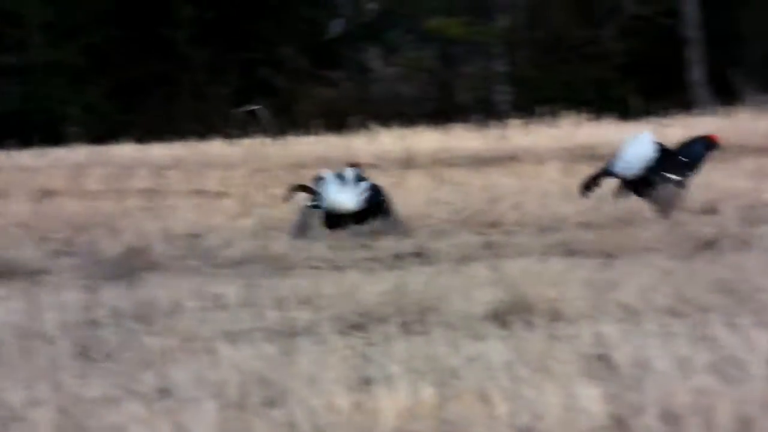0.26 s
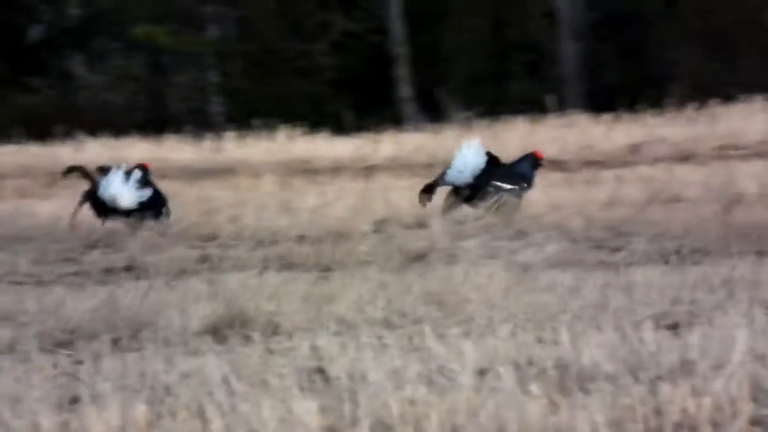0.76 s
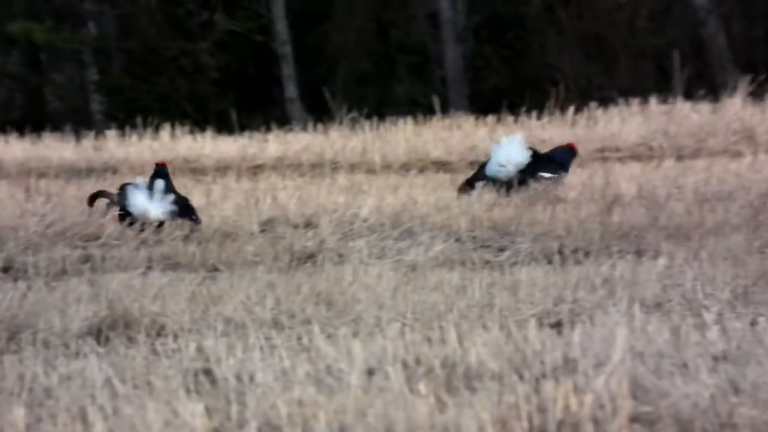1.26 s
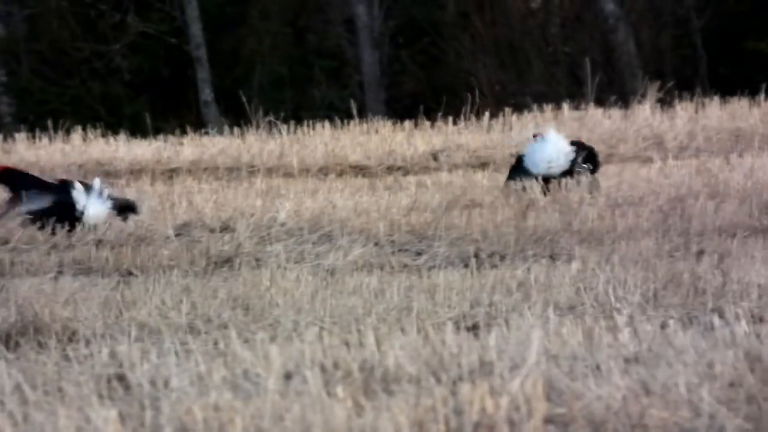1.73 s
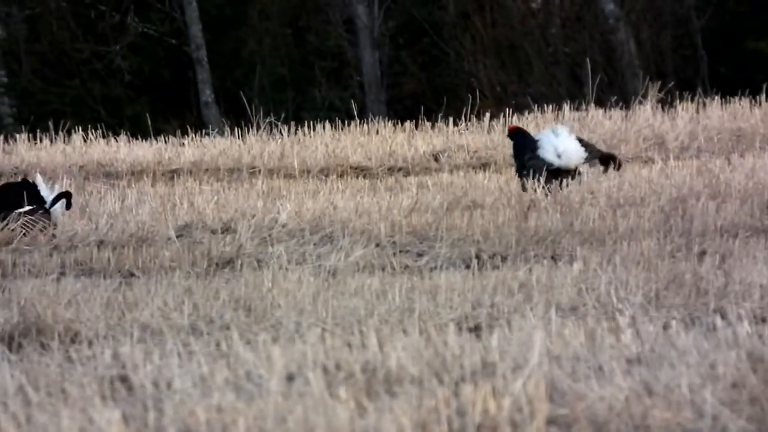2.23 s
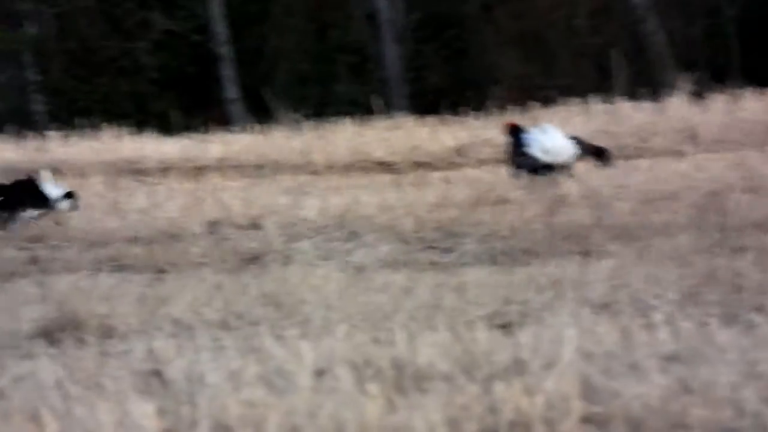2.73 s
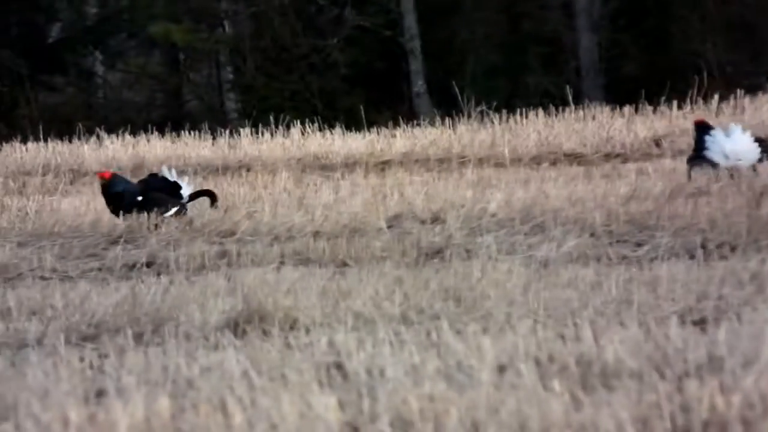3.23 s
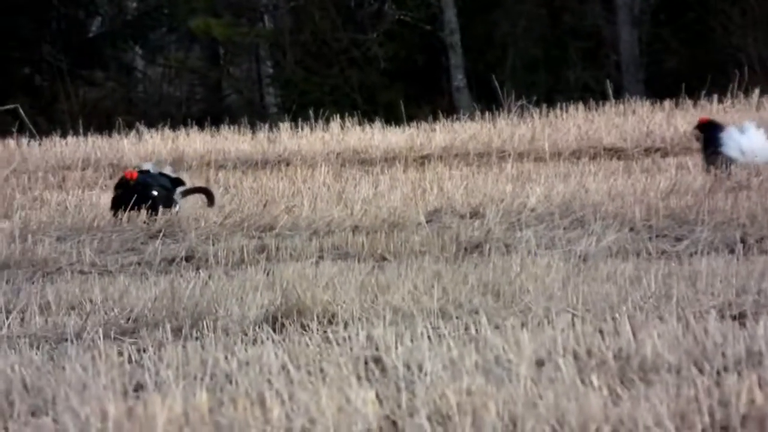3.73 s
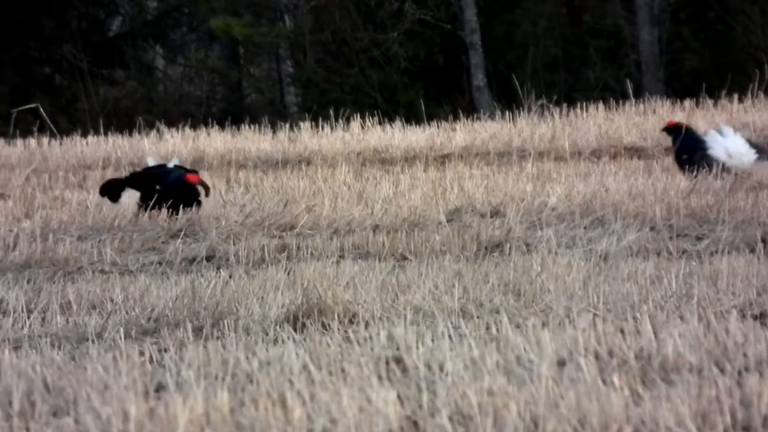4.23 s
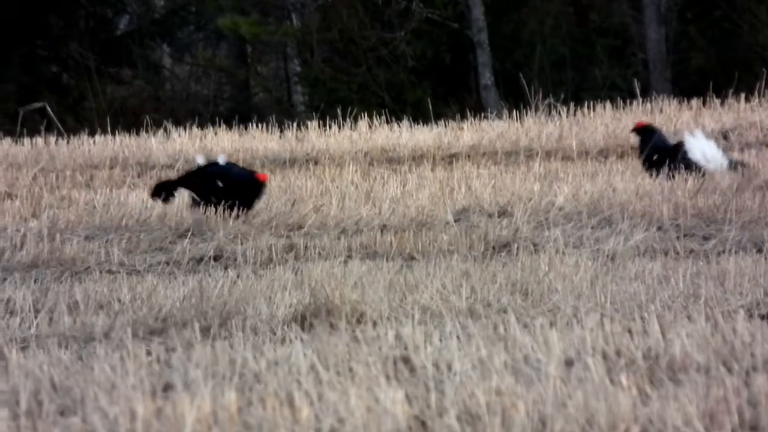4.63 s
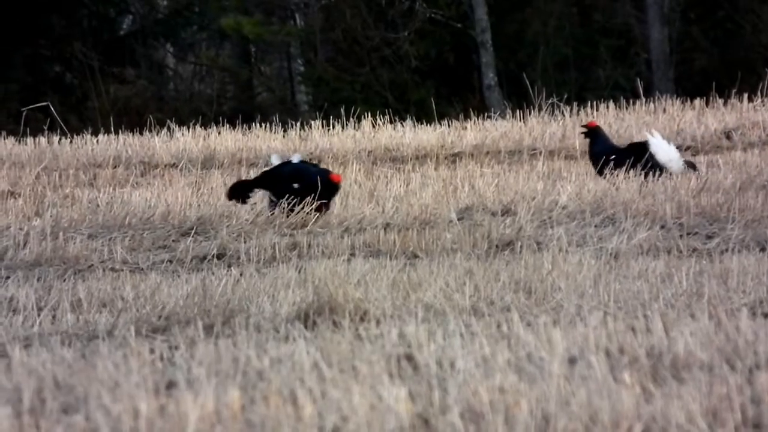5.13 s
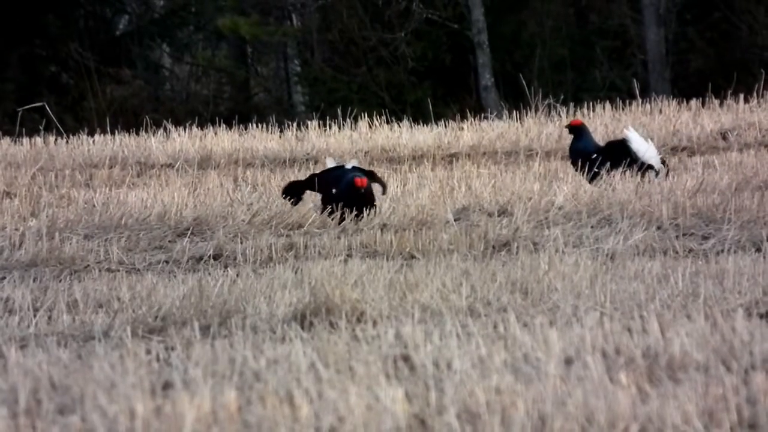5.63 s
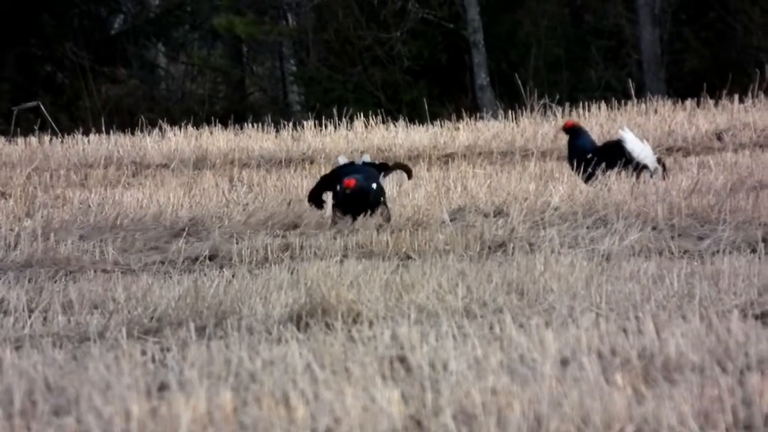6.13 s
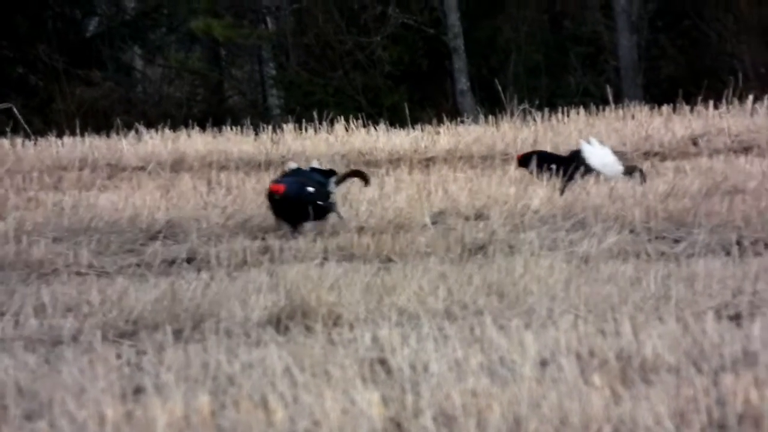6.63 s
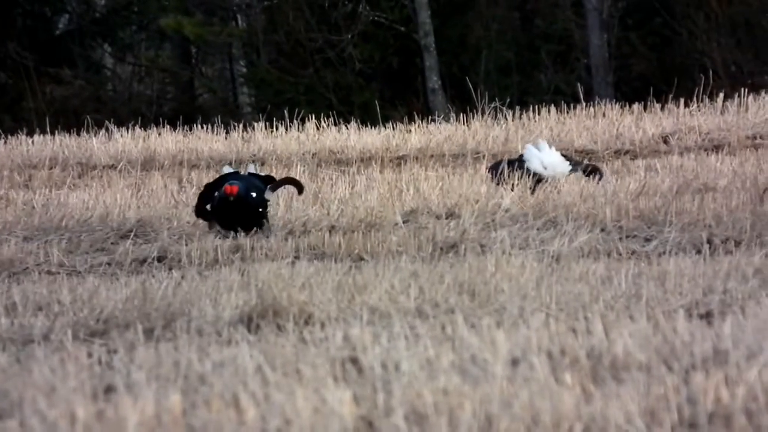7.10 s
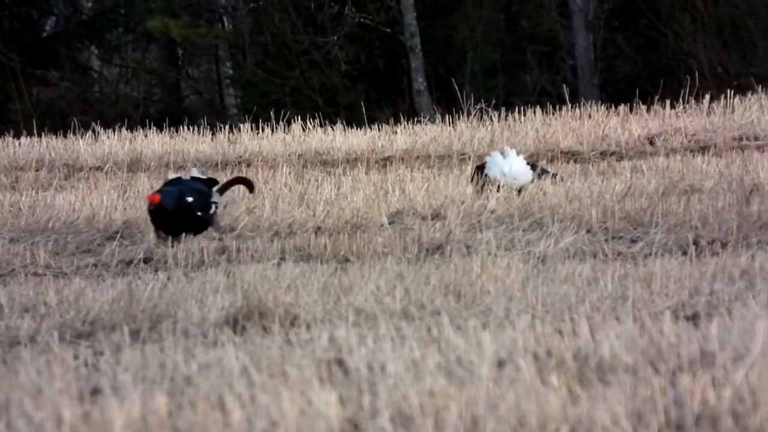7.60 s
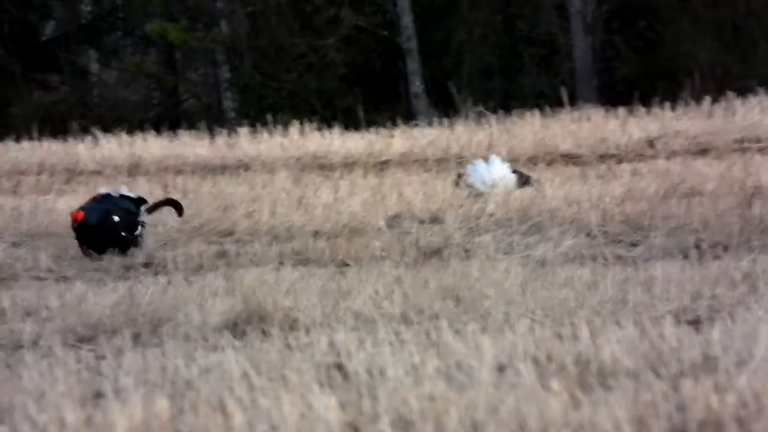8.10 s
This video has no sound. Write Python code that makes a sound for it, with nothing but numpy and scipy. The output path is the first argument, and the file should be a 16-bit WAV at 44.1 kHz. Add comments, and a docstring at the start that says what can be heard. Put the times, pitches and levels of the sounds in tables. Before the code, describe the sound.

Black grouse cocks on a stubble field keep up a continuous low bubbling of short, round, falling coos, several birds overlapping out of step. Far crows caw hoarsely throughout, a small bird pipes thinly early on, and later there is one clear hoot and a faint twitter. Sharp clicks, brief early scuffs, faint ticking, buzz and tiny high pips come from the camera and handling beside the microphone, over soft steady hiss.

```python
"""Black grouse cocks display on a stubble field at the edge of a wood.
Four near cocks repeat one strophe of short, pure, mostly falling coos, out of step, over the bubbling lek.
Far off, crows caw with rough harmonics, one clear hoot sounds, and small birds pipe and twitter.
At the microphone, shaped noise makes clicks, brief scuffs and steady hiss.
The camera beside it ticks and buzzes in narrow noise bands and whines in short pips of one high tone."""
import sys
import numpy as np
from scipy import signal
from scipy.io import wavfile

SR = 44100
rng = np.random.default_rng(int(sys.argv[2]) if len(sys.argv) > 2 else 0)


def output_pcm(signal):
    """Save a mono or channel-first signal as 16-bit PCM at the path in sys.argv[1].

    Samples are clipped to [-1, 1] before scaling.
    """
    pcm = np.clip(np.atleast_2d(signal).T, -1, 1) * 32767
    wavfile.write(sys.argv[1], SR, np.round(pcm).astype(np.int16))


N = 368676
TIME = np.arange(N) / SR   # [s]


def from_db(db):
    """Turn decibels into an amplitude gain."""
    return 10 ** (np.asarray(db) / 20)


def rms_one(x):
    """Scale a sound to unit power."""
    return x / np.sqrt(np.mean(x ** 2) + 1e-20)


def in_time(rows):
    """Read a (time, value) curve at every sample."""
    return np.interp(TIME, *np.transpose(rows))


def at_hz(points, hz):
    """Read a (frequency, value) curve on a log-frequency axis."""
    curve_hz, values = np.array(points).T
    return np.interp(np.log(hz), np.log(curve_hz), values)


def pan(lean_db):
    """Left and right gains that differ by lean_db; positive leans left."""
    return from_db(np.array([[.5], [-.5]]) * lean_db)


def band(x, low_hz, high_hz, order=2):
    """Butterworth band-pass."""
    sections = signal.butter(order, [low_hz, high_hz], "band", fs=SR, output="sos")
    return signal.sosfilt(sections, x + 1e-18)


def drift(rate):
    """Random wander of spread about 1, drawn as straight lines between 'rate' knots a second."""
    knots = rng.standard_normal(N // 40)
    return np.interp(TIME * rate, np.arange(len(knots)), knots)


def add(out, s, sound):
    """Mix a sound in from time s, trimmed to the scene."""
    at = round(s * SR) + np.arange(len(sound))
    inside = (at >= 0) & (at < N)
    out[at[inside]] += sound[inside]


# likeness of the two sides: (frequency [Hz], left-right correlation)
SIDE_CORRELATION = [(30, 0.16), (150, 0.048), (400, 0.64), (1000, .05), (3000, -0.013), (10000, -0.19)]
# balance of the two sides: (frequency [Hz], left minus right [dB])
SIDE_BALANCE = [(100, -1.5), (1000, -0.5), (2500, 0.5), (5000, 1.5), (10000, 0.5)]


def noise(spectrum):
    """Stereo noise of unit power, in third-octave bands that follow a spectrum."""
    out, edges = 0, np.geomspace(22, 14000, 29)
    white = rng.standard_normal((2, 2, N))
    for k, (low, high) in enumerate(zip(edges, edges[1:])):
        mid, side = band(white[k % 2], low, high, order=3)
        hz = np.sqrt(low * high)
        alike = np.clip(at_hz(SIDE_CORRELATION, hz), -1, 1)
        pair = np.sqrt(1 + alike) * mid + np.sqrt(1 - alike) * side * [[1], [-1]]
        out = out + from_db(at_hz(spectrum, hz)) * pan(at_hz(SIDE_BALANCE, hz)) * pair
    return rms_one(out)


def wood(x, t60, count=160):
    """Many faint echoes from the trunks, different for each ear, falling 60 dB in t60 seconds."""
    out = np.zeros((2, N))
    for ear in out:
        share, size = rng.random(count), rng.standard_normal(count)
        size = size * from_db(-40 * share)
        delays = (share * t60 * 2 / 3 * SR).astype(int)   # the first 40 dB of the decay
        for delay, gain in zip(delays, size / np.linalg.norm(size)):
            ear[delay:] += gain * x[:N - delay]
    return out


def gesture(length, hz, fall_hz, arch_hz):
    """Swell and phase of one note whose pitch arches and falls."""
    u = np.linspace(-1, 1, max(int(length * SR), 2))   # start to end of the note
    swell = np.abs(np.cos(np.pi * u / 2)) ** 1.5
    pitch = hz - fall_hz * u - arch_hz * u * u
    return swell, 2 * np.pi * (np.cumsum(pitch) / SR + rng.random())


def notes(rows):
    """Pure notes: a single gliding fundamental each, with no overtones."""
    out = np.zeros(N)
    for s, length, hz, fall_hz, arch_hz, level_db in rows:
        swell, phase = gesture(length, hz, fall_hz, arch_hz)
        add(out, s - length / 2, from_db(level_db) * swell * np.sin(phase))
    return out


# one strophe, shared by all near cocks; it climbs to a high flick and a long arch, then tumbles down:
# (middle from the flick [s], length [s], pitch [Hz], fall per half note [Hz], arch [Hz],
#  relative peak [dB])
STROPHE_NOTES = [(-1.177, 0.073, 491.0, 126.0, 0.0, -24.1), (-0.816, 0.093, 515.0, 85.0, 67.0, -23.5),
                 (-0.717, 0.037, 531.0, 124.0, 31.0, -20.8), (-0.586, 0.108, 488.0, 124.0, 22.0, -25.2),
                 (-0.495, 0.048, 459.0, 71.0, 2.0, -23.5), (-0.427, 0.091, 490.0, 108.0, 58.0, -24.3),
                 (-0.295, 0.082, 455.0, 61.0, 5.0, -25.5), (-0.144, 0.095, 523.0, 5.0, 184.0, -20.6),
                 (-0.069, 0.042, 491.0, 107.0, 0.0, -23.8), (0.0, 0.029, 575.0, 78.0, 33.0, -16.1),
                 (0.094, 0.084, 587.0, 49.0, 200.0, -18.3), (0.166, 0.089, 528.0, -53.0, 200.0, -26.8),
                 (0.257, 0.054, 496.0, 102.0, 67.0, -20.4), (0.373, 0.059, 491.0, 90.0, 95.0, -30.9),
                 (0.455, 0.032, 533.0, 150.0, 91.0, -24.5), (0.665, 0.034, 439.0, 77.0, 0.0, -25.6),
                 (0.81, 0.046, 444.0, 23.0, 95.0, -23.7), (0.888, 0.044, 433.0, 43.0, 58.0, -25.3),
                 (1.026, 0.051, 465.0, 108.0, 0.0, -22.2), (1.104, 0.07, 452.0, 53.0, 82.0, -25.4),
                 (1.252, 0.091, 463.0, 112.0, 0.0, -25.2), (1.331, 0.032, 476.0, 100.0, 63.0, -22.3)]
# four near cocks, bird by bird, each repeating the strophe about every 3 s:
# (flick [s], relative level [dB], pitch shift [Hz], lead-in stretch [ratio], ending stretch [ratio])
STROPHE_BOUTS = [(0.468, 0.9, 3.0, 1.011, 1.004), (3.227, 1.1, 1.0, 1.004, 1.002),
                 (5.965, 0.8, 8.0, 1.001, 1.001), (8.757, 1.8, 4.0, 1.01, 0.999),
                 (1.902, 0.9, -5.0, 1.001, 0.995), (4.706, -0.0, -2.0, 0.987, 1.004),
                 (7.525, -0.9, -1.0, 0.993, 1.059), (0.894, 0.4, 0.0, 0.994, 1.036),
                 (4.056, -0.8, -1.0, 1.022, 0.999), (7.083, 0.8, 0.0, 0.995, 1.008),
                 (0.682, -9.0, -31.0, 0.991, 0.996), (3.465, -0.7, 8.0, 1.012, 1.004),
                 (6.232, 1.3, 5.0, 1.024, 0.998)]


def near_cocks():
    """Each bout is the same strophe at its own pitch, pace and strength; the throat passes pure tones."""
    rows = []
    for flick_s, bout_db, shift_hz, lead_in, ending in STROPHE_BOUTS:
        for s, length, hz, fall_hz, arch_hz, level_db in STROPHE_NOTES:
            middle_s = flick_s + s * (lead_in if s < 0 else ending)
            rows.append((middle_s, length, hz + shift_hz, fall_hz, arch_hz, level_db + bout_db))
    return notes(rows)


def far_cock(pitch_hz, spread_hz, fall_hz, arch_hz, length, step, count=150):
    """One bird farther out bubbling on and on, each coo a little different in time, pitch and level."""
    chance = rng.standard_normal((count, 6)).T
    times = (np.arange(count) - rng.random() + .2 * chance[0]) * step
    lengths = length * from_db(1.5 * chance[1])
    pitches = pitch_hz + spread_hz * np.tanh(chance[2])
    falls = fall_hz * (1 + .5 * chance[3])
    arches = arch_hz * (1 + .5 * chance[4])
    return rms_one(notes(zip(times, lengths, pitches, falls, arches, 1.9 * chance[5])))


# swell of the rest of the lek: (time [s], relative level [dB])
CHORUS_LEVEL = [(0, -26.6), (.22, -35), (.3, -26), (.85, -31), (1.01, -25), (1.23, -33), (2.02, -25.8),
                (2.42, -34), (2.6, -28), (3.65, -26), (3.8, -33), (4.22, -25.2), (4.4, -33), (4.75, -27),
                (5.28, -33), (5.39, -25), (6.8, -29), (8.36, -26.5)]


def chorus():
    """Two higher and two lower voices; the throat sac radiates only near its resonance."""
    high = sum(far_cock(pitch_hz=525, spread_hz=45, fall_hz=58, arch_hz=38, length=.06, step=.085)
               for _ in range(2))
    low = sum(far_cock(pitch_hz=448, spread_hz=34, fall_hz=44, arch_hz=28, length=.062, step=.078)
              for _ in range(2))
    voices = rms_one(band(low + from_db(-1) * high, 330, 635, order=4))
    return from_db(in_time(CHORUS_LEVEL) - 7.5) * voices


# stronger moments of the lek: single coos, and brief swells where overlapping coos beat together:
# (middle [s], length [s], pitch [Hz], fall per half note [Hz], relative peak [dB])
STRONG_MOMENTS = [(0.029, 0.022, 498.0, -40.0, -15.0), (0.286, 0.084, 482.0, 65.0, -24.0),
                  (0.33, 0.04, 495.0, 71.0, -19.0), (0.37, 0.023, 506.0, -14.0, -18.0),
                  (0.448, 0.029, 467.0, -35.0, -21.3), (0.571, 0.029, 434.0, 27.0, -23.3),
                  (0.655, 0.048, 467.0, 28.0, -20.4), (0.792, 0.023, 498.0, -40.0, -18.7),
                  (1.026, 0.083, 524.0, -28.0, -20.3), (1.208, 0.046, 421.0, 34.0, -30.3),
                  (1.449, 0.09, 426.0, -20.0, -27.5), (1.512, 0.05, 543.0, 1.0, -30.2),
                  (1.657, 0.06, 447.0, 64.0, -23.7), (1.71, 0.027, 478.0, -18.0, -19.6),
                  (1.859, 0.042, 433.0, 33.0, -27.1), (1.882, 0.073, 468.0, 116.0, -20.2),
                  (1.962, 0.095, 505.0, 108.0, -22.4), (2.049, 0.11, 481.0, 73.0, -21.2),
                  (2.113, 0.082, 488.0, 137.0, -21.3), (2.202, 0.059, 488.0, 75.0, -17.7),
                  (2.328, 0.042, 499.0, 130.0, -21.5), (2.421, 0.034, 409.0, 7.0, -28.3),
                  (2.493, 0.049, 445.0, 90.0, -27.8), (2.594, 0.079, 485.0, 118.0, -24.1),
                  (2.655, 0.023, 402.0, -31.0, -26.5), (2.719, 0.056, 456.0, 87.0, -21.5),
                  (2.836, 0.101, 475.0, 130.0, -23.8), (2.887, 0.03, 496.0, 36.0, -21.8),
                  (3.063, 0.093, 488.0, 125.0, -23.5), (3.185, 0.04, 523.0, -27.0, -22.1),
                  (3.256, 0.11, 513.0, 1.0, -22.4), (3.359, 0.022, 520.0, -40.0, -20.3),
                  (3.397, 0.036, 415.0, -16.0, -24.8), (3.437, 0.022, 509.0, -40.0, -15.8),
                  (3.482, 0.063, 473.0, 9.0, -19.0), (3.529, 0.022, 488.0, -40.0, -14.3),
                  (3.612, 0.035, 459.0, 13.0, -19.3), (3.675, 0.034, 544.0, -40.0, -19.0),
                  (3.747, 0.066, 470.0, -40.0, -22.4), (3.838, 0.056, 529.0, -40.0, -26.1),
                  (3.875, 0.03, 506.0, -32.0, -22.8), (3.944, 0.088, 514.0, 150.0, -24.4),
                  (4.089, 0.04, 442.0, 10.0, -22.5), (4.172, 0.034, 510.0, 58.0, -17.4),
                  (4.199, 0.081, 421.0, 8.0, -22.8), (4.621, 0.088, 458.0, 71.0, -27.9),
                  (4.73, 0.029, 465.0, -20.0, -17.1), (4.873, 0.085, 495.0, 97.0, -19.0),
                  (4.93, 0.022, 531.0, -40.0, -22.3), (5.002, 0.056, 475.0, 89.0, -25.0),
                  (5.149, 0.046, 469.0, 146.0, -21.1), (5.221, 0.026, 478.0, 62.0, -18.7),
                  (5.297, 0.031, 435.0, 63.0, -26.0), (5.345, 0.022, 482.0, 59.0, -18.0),
                  (5.441, 0.03, 441.0, 22.0, -19.0), (5.589, 0.067, 466.0, 3.0, -20.6),
                  (5.769, 0.031, 468.0, -40.0, -16.9), (5.878, 0.064, 514.0, 83.0, -20.9),
                  (6.036, 0.027, 510.0, 15.0, -14.5), (6.125, 0.038, 439.0, 20.0, -23.3),
                  (6.194, 0.068, 490.0, 110.0, -18.1), (6.21, 0.03, 525.0, -28.0, -16.3),
                  (6.451, 0.075, 500.0, 150.0, -22.7), (6.507, 0.028, 469.0, -27.0, -16.3),
                  (6.554, 0.033, 484.0, -40.0, -19.3), (6.713, 0.034, 423.0, 18.0, -23.6),
                  (6.901, 0.027, 492.0, 54.0, -22.6), (6.936, 0.09, 415.0, 32.0, -26.5),
                  (7.155, 0.022, 462.0, -32.0, -21.4), (7.194, 0.035, 481.0, 88.0, -19.0),
                  (7.384, 0.067, 436.0, 46.0, -25.0), (7.435, 0.022, 472.0, -40.0, -19.3),
                  (7.608, 0.022, 508.0, 7.0, -15.1), (7.667, 0.1, 469.0, 80.0, -22.9),
                  (7.734, 0.045, 477.0, 72.0, -16.8), (7.802, 0.045, 478.0, 0.0, -18.0),
                  (7.855, 0.053, 518.0, 97.0, -24.2), (7.863, 0.022, 442.0, -40.0, -23.6),
                  (7.888, 0.044, 519.0, 43.0, -19.7), (7.964, 0.031, 528.0, -40.0, -21.4),
                  (8.122, 0.059, 440.0, -6.0, -23.6), (8.204, 0.064, 531.0, 18.0, -26.0),
                  (8.264, 0.038, 538.0, 44.0, -24.2), (8.31, 0.022, 473.0, -40.0, -16.6)]


def strong_moments(arch_hz=15):
    """Single coos and the brief swells of coos beating together, each drawn as one gliding pure note."""
    return notes((s, length, hz, fall_hz, arch_hz, level_db)
                 for s, length, hz, fall_hz, level_db in STRONG_MOMENTS)


def grouse(ear_lag_s=.00006):
    """The whole lek reaches the left side first and a little louder, with faint echo from the wood."""
    song = from_db(-.5) * near_cocks() + from_db(-.9) * strong_moments() + chorus()
    direct = np.array([song, np.interp(TIME - ear_lag_s, TIME, song)])
    return direct * pan(2.6) + from_db(-15) * wood(song, t60=.4)


# colour of the background noise, air and hiss, with a deep notch near 8 kHz left by audio coding:
# (frequency [Hz], relative density [dB per Hz])
BACKGROUND_COLOUR = [(25, -13.5), (55, -5.2), (120, -0.3), (240, -0.8), (330, 2), (700, 3.2), (1000, -3),
                     (2000, -4.5), (2700, -6.5), (3200, -6.5), (4300, -6), (7000, -10), (8200, -56),
                     (10300, -15), (11800, -46)]
# its slow rise and fall: (time [s], relative level [dB])
BACKGROUND_LEVEL = [(0.0, -40.5), (0.18, -45.5), (0.42, -45), (0.93, -47), (1.26, -45), (2.58, -46.5),
                    (3.33, -46.5), (4.49, -46.5), (5.63, -43.5), (5.8, -46), (7.85, -46), (8.36, -45)]


def background():
    """Steady air and hiss: coloured stereo noise with small level changes."""
    return from_db(in_time(BACKGROUND_LEVEL) + 8.6) * noise(BACKGROUND_COLOUR)


# buzz of the camera: (time [s], relative level [dB])
BUZZ_LEVEL = [(0, -54), (1.3, -53), (1.5, -49), (8.36, -49.5)]


def camera_buzz():
    """Close by, a faint narrow noise band flutters about 30 times a second."""
    flutter = np.sin(2 * np.pi * (30 * TIME + .4 * drift(10)))
    hum = rms_one(band(rng.standard_normal((2, N)), 2463, 2815))
    return from_db(in_time(BUZZ_LEVEL) + 4.6 * flutter) * hum * pan(5.4)


# brief scuffs close by: (start [s], length [s], relative level [dB])
SCUFF_TIMES = [(0.023, 0.037, -22.8), (1.243, 0.018, -32), (1.302, .034, -20.2)]
# colour of their grit: (frequency [Hz], relative density [dB per Hz])
GRIT_COLOUR = [(700, -15), (1400, -3.5), (2000, -21), (2600, -4), (4100, -2), (5000, -5.5), (7400, -3),
               (8500, -30), (10200, -7), (12500, -44)]
# resonances they excite, each varied a little: (frequency [Hz], width [Hz], relative level [dB])
SCUFF_RESONANCES = [(2570, 200, 10), (2900, 200, 2), (3880, 300, 5.5), (4430, 190, 5), (6150, 400, -5),
                    (7200, 400, 7)]


def scuffs(attack=0.007, t60=0.14, grain_db=3, easing_db=3, flutter_db=1, flutter_hz=80,
           ring_spread=.025, ring_spread_db=2):
    """A short gritty slide that catches and eases off as it goes; each rings a little differently."""
    out, age = np.zeros((2, N)), np.arange(SR // 4) / SR
    grit = from_db(grain_db * drift(600)) * noise(GRIT_COLOUR)
    for s, length, level_db in SCUFF_TIMES:
        fade_db = easing_db * age / length + 60 * np.maximum(age - length, 0) / t60
        flutter = flutter_db * np.cos(2 * np.pi * flutter_hz * (age - attack))
        force = np.minimum(age / attack, 1) * from_db(level_db - fade_db + flutter)
        rub = force * np.roll(grit, -round(s * SR), axis=1)[:, :len(age)]
        sound = rub
        for hz, width_hz, ring_db in SCUFF_RESONANCES:
            hz = hz * (1 + ring_spread * rng.uniform(-1, 1))
            gain = from_db(ring_db + ring_spread_db * rng.uniform(-1, 1))
            sound = sound + gain * band(rub, hz - width_hz / 2, hz + width_hz / 2, order=1)
        for ear, heard in zip(out, sound):
            add(ear, s - attack / 2, heard)
    return from_db(-2.3) * band(out, 700, 11500) * pan(5.7)


# distant caws:
# (middle [s], pitch [Hz], fall per half note [Hz], rasp [share of pitch], relative level [dB])
CAW_CALLS = [(.25, 462, -15, .045, -40.5), (1.245, 461, 0, .04, -39.5), (1.553, 436, 25, .035, -38.5),
             (1.8, 449, 10, .06, -46), (2.2, 401, 10, .07, -51.5), (2.665, 462, -8, .035, -38.5),
             (3.93, 468, -18, .03, -37), (4.195, 434, 20, .04, -39.5), (4.41, 440, 10, .06, -46),
             (4.805, 442, 0, .025, -38.3), (5.2, 425, 10, .08, -46), (5.753, 481, -30, .018, -38),
             (6.37, 464, -25, .022, -37.5), (6.68, 419, 10, .07, -47), (7.15, 444, 10, .07, -49.5),
             (7.46, 466, -20, .026, -37.3), (7.733, 431, 25, .04, -36.5), (8.107, 436, 12, .045, -36),
             (8.285, 445, 10, .08, -46)]
# nasal resonance of the crow's throat: (frequency [Hz], gain [dB])
THROAT_GAIN = [(400, -20), (900, -8), (1150, -4.5), (1380, -3), (1520, -4), (1700, 3), (1860, 1.5),
               (2020, -4), (2350, -7), (3000, -16)]


def crows(length=.16, arch_hz=125, taper=.85, doubling=12):
    """Far, hoarse calls arch into a nasal resonance and out; raspier ones gain half harmonics."""
    out, jitter = np.zeros(N), drift(350)
    for s, hz, fall_hz, rasp, level_db in CAW_CALLS:
        _, phase = gesture(length, hz, fall_hz, arch_hz)
        pitch = np.maximum(np.gradient(phase) * SR / (2 * np.pi), 1)
        wander = np.roll(jitter, -round(s * SR))[:len(phase)]
        phase = phase + 2 * np.pi * np.cumsum(wander) * rasp * hz / SR
        voice = 0
        for k in range(2, 13):   # in half harmonics; the odd ones make every other beat weaker
            strength = doubling * rasp if k % 2 else 1
            throat = from_db(at_hz(THROAT_GAIN, k / 2 * pitch))
            voice = voice + strength * throat * np.sin(k / 2 * phase)
        swell = signal.windows.tukey(len(phase), taper)
        add(out, s - length / 2, from_db(level_db) * swell * rms_one(voice))
    # the uneven beat of the syrinx fills in between the harmonics
    out = band(out * (1 + 0.55 * drift(300)), 500, 1970, order=5)
    return (from_db(3.8) * out + from_db(1) * wood(out, t60=.09) + wood(out, t60=.45)) * pan(1.8)


# strength of the lens motor's pips: (time [s], relative peak [dB])
PIP_LEVEL = [(.2, -43), (.45, -51), (1.15, -48), (1.5, -66), (2.1, -42), (2.34, -44), (2.6, -64),
             (3.05, -48), (3.77, -41.5), (4.24, -41.5), (4.48, -57), (5.2, -40), (5.44, -58), (5.9, -42),
             (6.63, -41.5), (6.87, -62), (7.34, -51), (7.7, -64), (8.3, -44)]


def camera_whine(whine_hz=12552, first_s=.195, step_s=.2382, pip_s=0.031):
    """The lens motor close by whines in short, steady pips of one high tone."""
    pips = np.zeros(N)
    for s in np.arange(first_s, N / SR, step_s):
        add(pips, s - pip_s / 2, signal.windows.tukey(int(pip_s * SR), .7))
    return from_db(in_time(PIP_LEVEL) + 1) * pips * np.sin(2 * np.pi * whine_hz * TIME) * pan(9.1)


# sharp clicks close by: (time [s], relative peak [dB])
CLICK_TIMES = [(.232, -29), (0.535, -30), (1.241, -24), (1.367, -30), (1.833, -30), (2.467, -28.5),
               (3.532, -35), (3.623, -35), (4.336, -27.5), (4.703, -29.5), (5.336, -23.5), (6.738, -21),
               (7.572, -26.5), (7.939, -29.5)]
# their colour: (frequency [Hz], relative density [dB per Hz])
CRACK_COLOUR = [(200, -7), (700, 6), (1600, -1.5), (2200, 5), (3000, -1), (6500, -2), (8000, -38),
                (12000, -18)]


def clicks(t60=0.044):
    """Each click near the microphone is a sharp crack of noise that falls 60 dB in t60 seconds."""
    force, age = np.zeros(N), np.arange(SR // 10) / SR
    for s, level_db in CLICK_TIMES:
        add(force, s, from_db(level_db - 60 * age / t60))
    return band(force * noise(CRACK_COLOUR), 100, 7000, order=3) * pan(3) * from_db(3.5)


# faint tones near 850 Hz, mostly the second harmonic of the far caws, and one clear hoot at 5.55 s: # (middle
# [s], pitch [Hz], relative peak [dB])
FAINT_TONES = [(.295, 800, -30), (1.275, 920, -34), (1.57, 870, -35), (1.77, 830, -38.5),
               (3.82, 866, -36.5), (4.25, 861, -34.5), (5.15, 850, -35.5), (5.47, 830, -37),
               (5.55, 788, -22), (5.58, 875, -33), (5.765, 750, -36), (6.68, 830, -39), (8.15, 848, -36),
               (8.3, 1250, -39)]


def caw_tones_and_hoot(length=.11, fall_hz=25, arch_hz=30):
    """Faint quavering tones, mostly the caws' second harmonic, and one clear hoot, with echoes."""
    tones = notes((s, length, hz, fall_hz, arch_hz, level_db) for s, hz, level_db in FAINT_TONES)
    tones = tones * (.8 + .7 * drift(230))
    return (tones + from_db(-4) * wood(tones, t60=.3)) * pan(1.5)


# spells of lens ticking: (start [s], end [s])
TICKING_SPELLS = [(0.549, 1.2), (1.851, 2.3), (3.51, 4.15), (4.72, 6), (6.85, 7.4), (7.95, 9.4)]


def camera_ticks(rate=10, tick_t60=.06):
    """While it focuses, the lens ticks ten times a second: decaying bursts in a very narrow noise band."""
    steps = 0
    for start, end in TICKING_SPELLS:
        age = (TIME - start) % (1 / rate)
        steps = steps + (TIME > start) * (TIME < end) * from_db(-60 * age / tick_t60)
    return band(from_db(-20.5) * steps * rng.standard_normal((2, N)), 6600, 6670) * pan(5.4)


# a small bird pipes, and once chips sharply:
# (middle [s], length [s], pitch [Hz], fall per half note [Hz], arch [Hz], relative peak [dB])
PIPED_NOTES = [(1.087, .075, 4500, -250, 280, -36.5), (1.405, .075, 4400, 0, 100, -37.5),
               (2.797, .075, 4340, 130, 40, -35), (3.055, .06, 4480, 0, 300, -35.5),
               (3.285, .075, 4330, 60, 80, -35.3), (3.319, .03, 5100, 800, 500, -39),
               (3.505, .06, 4450, -60, 200, -39), (3.56, .04, 4480, 0, 200, -42),
               (3.62, .03, 4100, 60, 100, -43), (3.7, .04, 4430, -60, 150, -44)]


def piping_bird():
    """A far small bird's high pure notes quaver in level and echo off the wood."""
    piping = notes(PIPED_NOTES) * (1 + .5 * drift(450))
    return (from_db(-2) * piping + from_db(-4.5) * wood(piping, t60=.35)) * pan(1.5)


# a far songbird's twitter: (time [s], relative level [dB])
TWITTER_LEVEL = [(4.6, -58), (5, -48.5), (5.3, -49), (5.65, -44), (5.85, -54), (6.2, -53), (6.7, -66)]
# the few single notes that end its slides:
# (middle [s], pitch [Hz], fall per half note [Hz], relative peak [dB])
ENDING_NOTES = [(5.635, 4100, 500, -42), (5.745, 4600, 1500, -40), (6.035, 3900, -200, -40.5),
                (6.52, 4700, 200, -42)]


def songbird(note_s=.06, first_hz=4800, last_hz=3500, slide_fall_hz=700, ending_arch_hz=400):
    """Far off, downward slides step lower and end in single notes, over a quick, faint twitter."""
    twitter_times = np.arange(TWITTER_LEVEL[0][0], TWITTER_LEVEL[-1][0], 1 / 90)
    twitter = rms_one(notes((s, .024, rng.uniform(3100, 4900), rng.normal(300, 400), 150, rng.normal(0, 2))
                            for s in twitter_times))
    times = np.arange(4.99, 5.5, .082)
    pitches = np.geomspace(first_hz, last_hz, len(times))
    slides = notes((s, note_s, hz, slide_fall_hz, 0, -43.5) for s, hz in zip(times, pitches))
    ending = notes((s, note_s, hz, fall_hz, ending_arch_hz, level_db)
                   for s, hz, fall_hz, level_db in ENDING_NOTES)
    song = (slides + ending) * (.85 + .95 * drift(600))   # quavering level
    song = song + from_db(in_time(TWITTER_LEVEL) - 6.5) * twitter
    return (from_db(-2) * song + from_db(-1.5) * wood(song, t60=.3)) * pan(1.5)


def scene():
    """The lek on the field, far birds, small sounds at the microphone, and the steady background."""
    birds = grouse() + crows() + caw_tones_and_hoot() + piping_bird() + songbird()
    camera = camera_buzz() + camera_whine() + camera_ticks()
    return birds + scuffs() + clicks() + camera + background()


def record(dry):
    """A steep elliptic low-pass cuts the top above 13.35 kHz."""
    return signal.sosfilt(signal.ellip(10, .1, 80, 13350, fs=SR, output="sos"), dry)


dry = scene()
out = record(dry)
output_pcm(out)
```